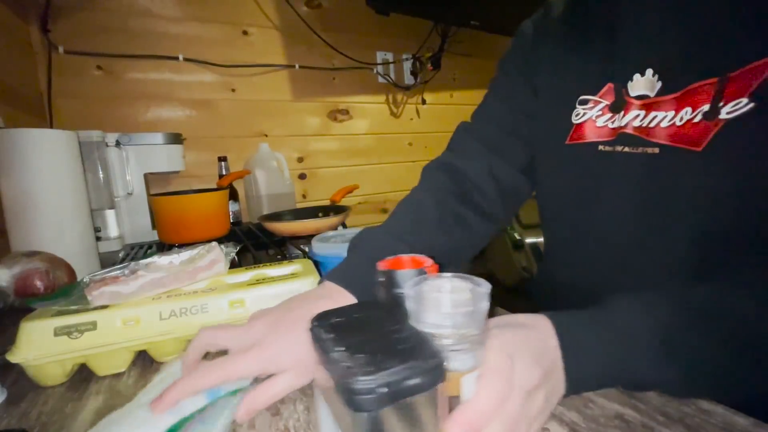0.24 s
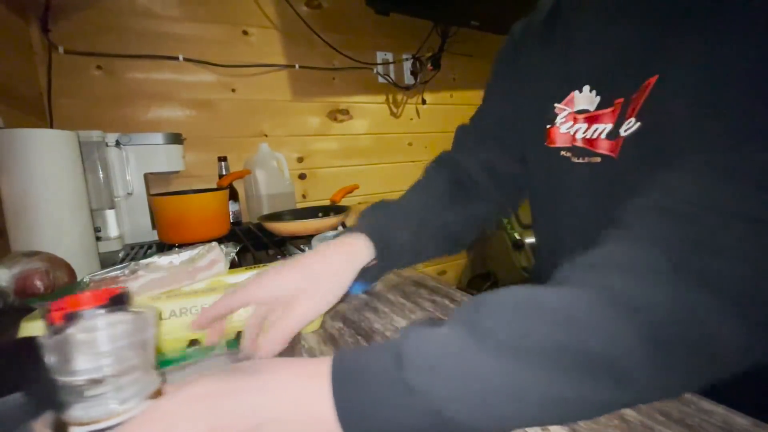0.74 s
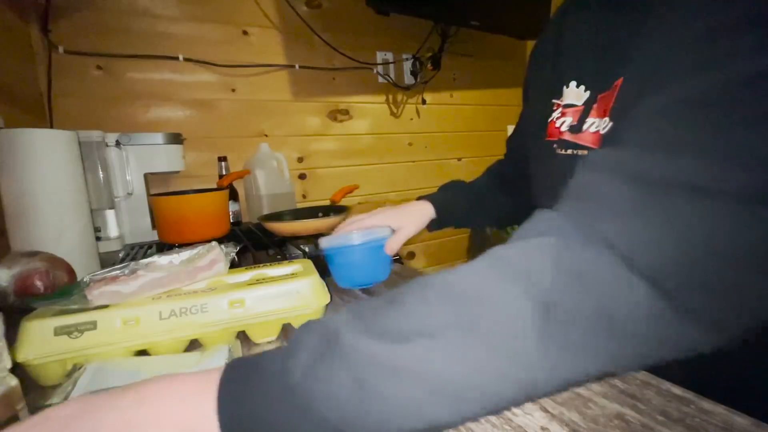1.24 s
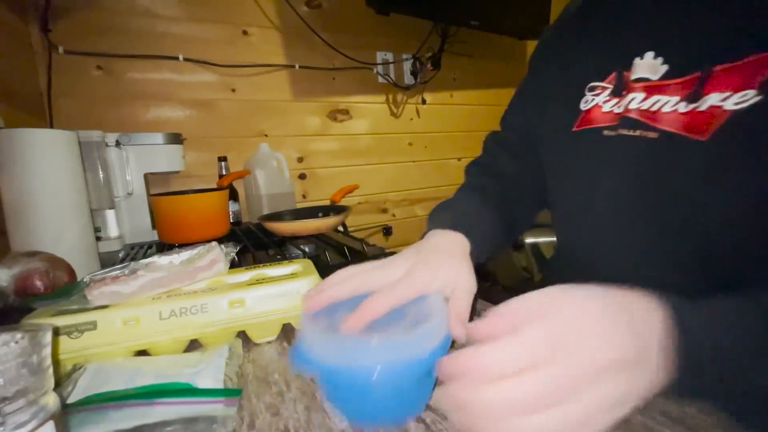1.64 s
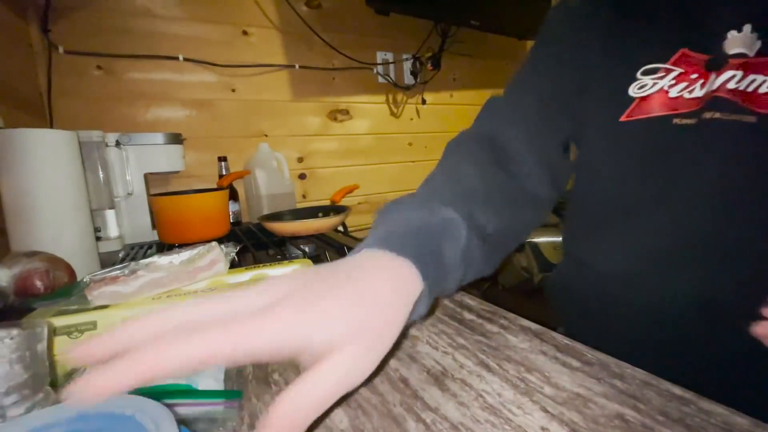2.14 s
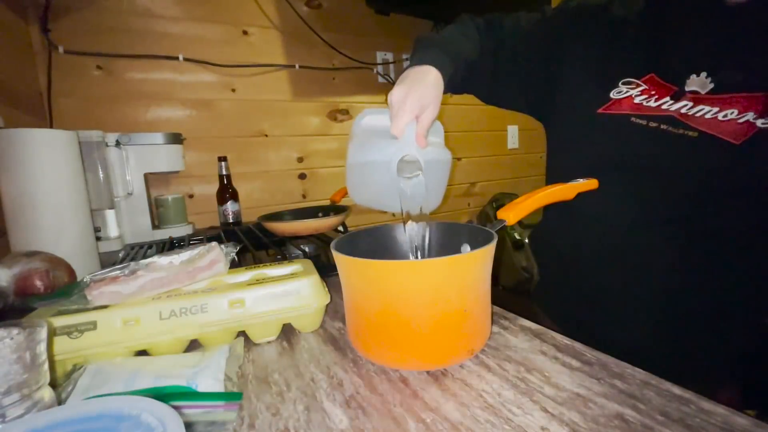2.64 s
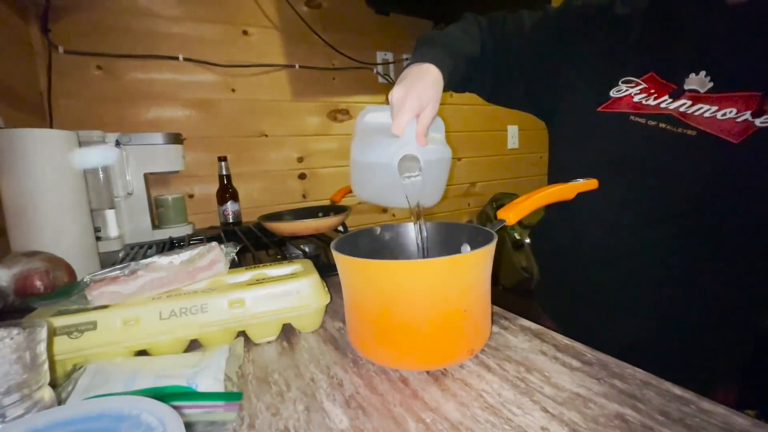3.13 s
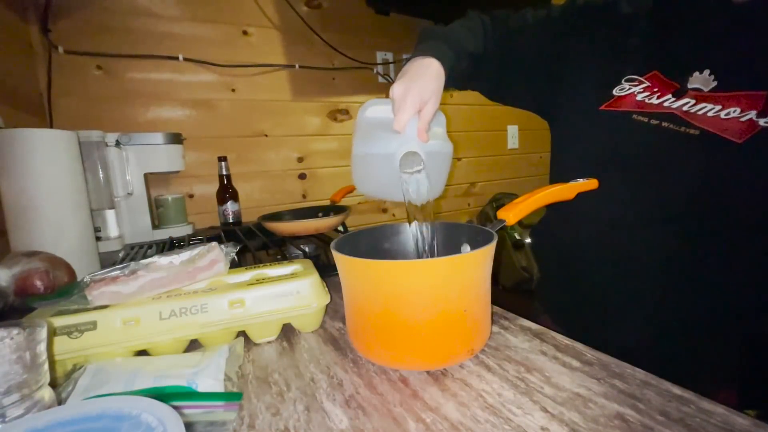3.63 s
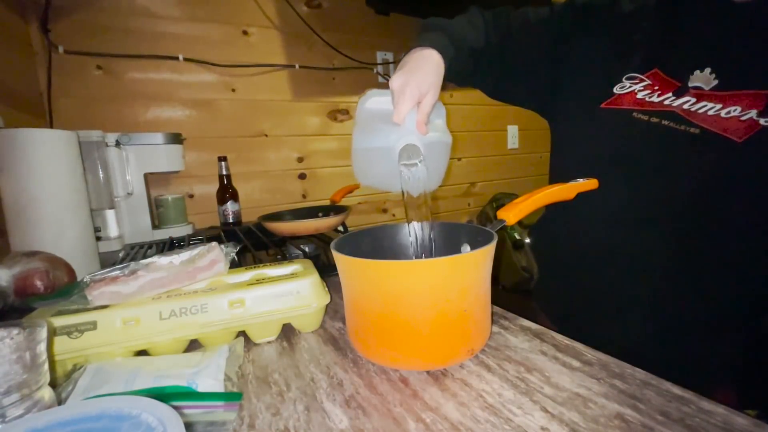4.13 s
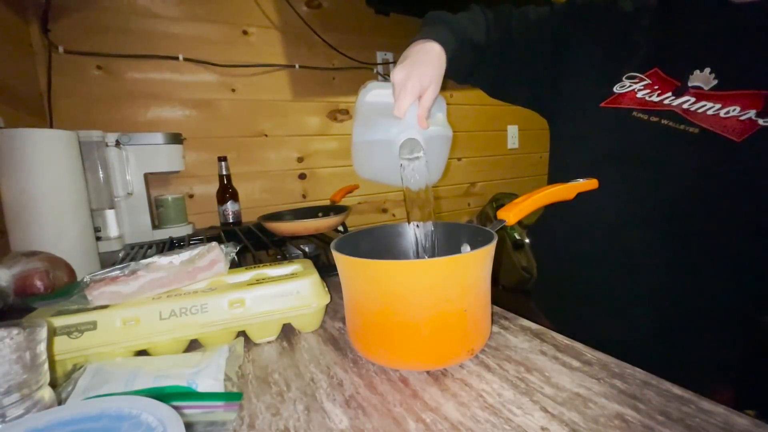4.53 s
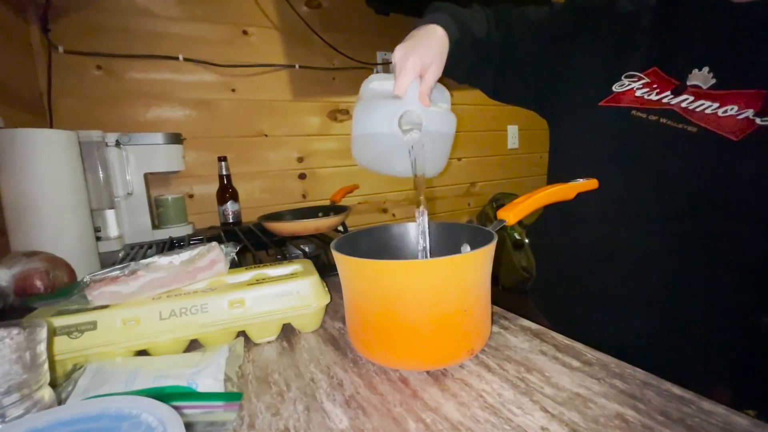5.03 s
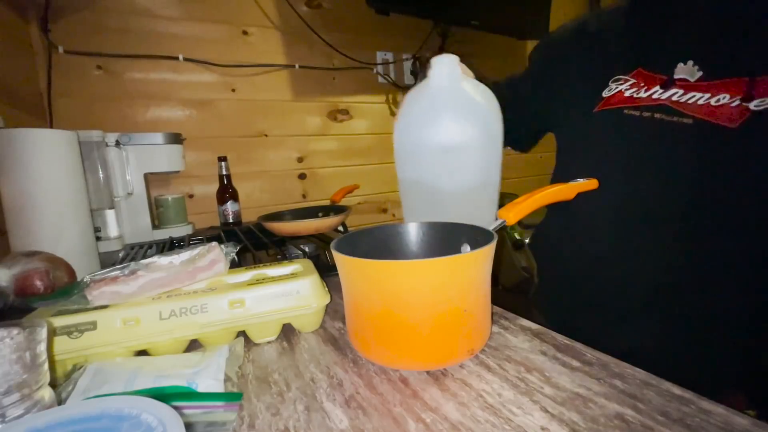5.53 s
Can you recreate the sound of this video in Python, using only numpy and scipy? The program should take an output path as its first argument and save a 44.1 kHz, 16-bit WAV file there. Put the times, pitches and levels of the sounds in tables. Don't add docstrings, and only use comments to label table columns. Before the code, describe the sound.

In a small wooden cabin kitchen, jars are shoved over the counter with a loud gritty scrape and hard clacks. A plastic tub drags after them with a faint squeak, thuds and a burst of glass clinks. Then much softer water patters into a metal saucepan, with jug glugs and bright plinks. A low generator drones throughout. Close stereo microphones, handling nearer the left.

```python
import sys
import numpy as np
from scipy import signal
from scipy.io import wavfile
from scipy.ndimage import uniform_filter1d

SR = 44100
rng = np.random.default_rng(int(sys.argv[2]) if len(sys.argv) > 2 else 0)


def to_wav(s):
    ch = np.atleast_2d(s).T
    pcm = np.round(np.clip(ch, -1, 1) * 32767)
    wavfile.write(sys.argv[1], SR, pcm.astype(np.int16))


def attenuation_scalar(level_db):
    decades = np.asarray(level_db, float) / 20
    return 10 ** decades


N = 254456

# [t/s, weight on counter level/dB, sliding speed level/dB]
JOSTLE = [
    (0, -24, -49.5),
    (0.06, -30, -75),
    (0.09, -41, -60),
    (0.13, -33, -45),
    (0.2, -31, -42),
]
PUSH = [
    (0.235, -27, -39),
    (0.265, -16, -37),
    (0.4, -13.5, -33),
    (0.68, -15, -36.5),
    (0.8, -16, -39.5),
    (1.03, -19, -43.5),
    (1.15, -25, -47),
    (1.2, -36.5, -57),
    (1.239, -42, -63),
]
DRAG = [
    (1.24, -52, -56),
    (1.33, -40, -45),
    (1.42, -22.5, -46),
    (1.54, -25.5, -37),
    (1.61, -20.5, -33.5),
    (1.66, -31, -30),
    (1.75, -28, -27.5),
    (1.86, -32.5, -32),
    (1.92, -44, -35.5),
]
SETTLE = [
    (1.97, -29, -39),
    (2.08, -27.5, -46),
    (2.22, -33, -54),
    (2.38, -43.5, -64),
    (2.46, -68, -86),
]
# [power of weight, power of speed, level/dB]
JARS_SCRAPE = (1.2, .3, 12.8)
TUB_SCRAPE = (.6, .35, 2.5)
# [f/Hz, width/Hz, level/dB]
JARS_COLOUR = [(29, -51), (50, -16.5), (155, -7.5), (218, -9.5), (291, 1.5), (337, -10), (408, 9.5),
               (1210, -11), (1870, -20), (12900, -45.5), (16000, -54)]
JARS_RING = [(156.4, 45, -1), (297, 16, -3), (641, 13, -1.5), (1043, 26, 3), (1267, 11.5, 4.5)]
TUB_COLOUR = [(29, -29), (50, -8), (189, -13), (291, -5.5), (337, -13.5), (428, -0.5), (646, 1), (997, -9),
              (2160, -16.5), (3030, -26.5), (4560, -23), (5530, -29), (13200, -33), (14900, -39),
              (16000, -66)]
TUB_RING = [(173, 50, -4), (302, 36, -6.5), (625, 14, -0.5), (4750, 510, -6.5)]
# [t/s, level/dB]
RUB = [
    (1.235, -54),
    (1.26, -38),
    (1.34, -35),
    (1.375, -40),
]
RUB_HZ, RUB_CLIMB_HZ, RUB_WIDTH_HZ = 780., 150., 240.
# [t/s, level/dB, f/Hz, t60/s, contact level/dB if hard]
THUDS = [(0.1425, -23, 305, 0.22, -1.5), (1.118, -20.5, 183, 0.14), (1.376, -10.5, 200, 0.12, -14),
         (1.407, -22.5, 300, 0.049), (1.449, -27, 178, 0.024), (1.476, -17.5, 208, 0.2),
         (1.489, -10.5, 173, 0.14, -8), (1.529, -16, 472, 0.061), (1.925, -18.5, 125, 0.094),
         (2.074, -18.5, 730, 0.087), (2.085, -17.5, 554, 0.11), (2.163, -15, 202, 0.1)]
# [t/s, level/dB, top band re clack/dB, glass ring re clack/dB if struck]
CLACKS = [(0.0815, -36.5, 1.5), (0.0945, -29.5, -5), (0.1425, -17, -12), (0.6425, -26, -37),
          (0.6948, -25.5, -15), (0.8854, -30, -4), (0.8922, -13, -5), (0.9933, -16, -6), (1.062, -16, -11),
          (1.087, -16.5, -1.5), (1.1673, -26.5, -41.5), (1.9205, -22, -19), (1.9832, -23, -20),
          (2.356, -45.5, 0), (2.4474, -50, -12)]
CLINKS = [(2.0184, -7.5, -15, -20.5), (2.0274, -16, -22, -24), (2.0486, -22, -11, -30),
          (2.0564, -13, -9, -38), (2.073, -15.5, -9, -31), (2.103, -21, -13, -29), (2.148, -23.5, -16, -31),
          (2.16, -23.5, -10, -29), (2.1854, -26, -36, -22), (2.1919, -20, -22, -23.5),
          (2.2114, -20, -34, -27)]
# [f/Hz, level/dB]
CLACK_COLOUR = [(710, -30), (1200, -14), (2140, -5), (3310, -5.5), (4930, -6.5), (7570, -19), (8000, -14),
                (10400, -35), (17600, -120)]
# [f/Hz, level/dB, t60/s]
GLASS = [(2800, -4, .06), (3343, 0, .15), (4828, -6, .1), (8634, 0, .26), (8662, -6, .2), (8700, -2, .05)]
# [t/s, flow level/dB, spray re flow/dB as the stream breaks up]
POUR = [(2.4, -65, 0), (2.6, -68.5, -21), (2.84, -62, -16), (2.9, -57, -1.5), (3.07, -54, 0.5),
        (3.17, -57, -1.5), (3.28, -51.5, -3.5), (3.38, -60, 2), (3.6, -52.5, -3), (3.85, -50.5, -3.5),
        (4.1, -49.5, -12), (4.7, -55, -10), (4.9, -54, -11), (5.05, -53, -5), (5.25, -48, -4.5),
        (5.37, -53.5, -6.5), (5.46, -67, -12), (5.64, -64.5, -8)]
FULL_FLOW_S = 3.4, 5.38
# [f/Hz, level/dB]
POUR_COLOUR = [(240, -46), (400, -6), (425, -3), (676, 4), (826, 2), (879, -8), (1650, -10.5), (1990, -11),
               (2320, -6.5), (5600, -20), (6850, -15.5), (7400, -30), (8240, -20.5), (12100, -22.5),
               (16000, -32)]
# [f/Hz, width/Hz, level/dB]
PAN = [(680, 60, -14), (1150, 48, -2.5), (1642, 5.9, 10.5), (1860, 9.8, 2), (2380, 27, -8), (3080, 58, -6)]
# [t/s, level/dB, f/Hz, t60/s]
GLUGS = [(2.869, -48, 670, 0.2), (3.245, -33.5, 735, 0.045), (3.266, -31, 640, 0.052),
         (3.607, -37.5, 648, 0.11), (3.684, -32.5, 670, 0.068), (4.059, -43.5, 805, 0.077),
         (4.35, -41, 620, 0.13), (4.387, -32.5, 776, 0.12), (4.423, -31, 674, 0.064),
         (4.484, -32.5, 519, 0.13), (4.727, -38.5, 625, 0.11), (4.773, -38, 684, 0.1),
         (4.842, -40, 666, 0.12), (4.891, -29, 560, 0.048), (5.175, -39, 734, 0.08),
         (5.191, -22.5, 563, 0.025), (5.235, -41, 553, 0.08), (5.285, -32.5, 543, 0.068),
         (5.334, -37, 580, 0.08), (5.365, -22, 513, 0.041)]
# [t/s, level/dB, f/Hz]
PLINKS = [(2.732, -46.5, 2280), (2.954, -48, 2800), (3.0028, -36.5, 2970), (3.0734, -39, 1770),
          (3.203, -40.5, 2820), (3.2417, -42.5, 3170), (3.419, -44, 2310), (3.4316, -44, 2730),
          (3.6829, -44, 2420), (3.727, -39, 2340), (3.7836, -35.5, 2200), (3.9657, -37, 2330),
          (4.0401, -42.5, 2340), (4.061, -37, 2200), (4.0899, -39, 2380), (4.3219, -43.5, 2800),
          (4.8895, -42.5, 2370), (5.2098, -39, 2440), (5.2593, -45, 2760)]
SPITS = [(2.6565, -44, 10500), (2.748, -49, 6000), (2.775, -47, 10400), (2.885, -41.5, 8340),
         (2.9356, -41.5, 5050), (3.01, -33, 6040), (3.0695, -39, 10600), (3.0997, -33.5, 7920),
         (3.28, -33, 11700), (3.3006, -32.5, 8020), (3.4774, -42.5, 10950), (4.091, -41, 7880),
         (5.1126, -37, 6700)]
# [t/s, level/dB]
SMACKS = [
    (4.3131, -44),
    (4.6154, -47),
    (4.7197, -47),
    (5.0524, -41),
    (5.1886, -40),
    (5.2584, -40),
    (5.2799, -42),
    (5.3403, -44),
    (5.3737, -43),
]
SMACK_TOP_DB = -.5
JUG_S, JUG_RISE_S, JUG_DB = 5.64, 0.058, -57.5
FIRING_HZ = 31.14
DRONE = [(1, -42), (2, 2.5), (3, -18), (4, -3.5), (5, -5), (6, -9.5), (7, -20), (8, -15.5), (10, -15),
         (12, -15.5), (14, -15)]
DRONE_DB = [(0, -39.5), (2.2, -41.5), (3.3, -41.5), (3.6, -42), (5.77, -42.5)]
# [f/Hz, level/dB]
AIR = [(12, -48), (20, -25), (49, -16), (127, -2.5), (150, -16.5), (187, -8.5), (399, -25), (542, -22.5),
       (660, -31.5), (1290, -31.5), (7520, -58), (10500, -59), (16000, -62)]
AIR_DB = -43
# [f/Hz, t60/s]
CABIN = [(100, 0.46), (500, 0.28), (2000, 0.48), (8000, 0.38), (16000, 0.026)]
# [f/Hz, left-right level/dB]
LEFT_PAIR = [
    [(0, 0), (260, -0.0), (600, 2.2), (1640, 3.6), (3010, 1.1), (4480, 5.9), (5940, 9.0), (7060, 12.3), (7670, 10.0), (8700, 9.2), (9650, 9.3), (10700, 9.0), (12100, 6.5), (16100, 6.2)],
    [(60, 3.0), (110, 4.0), (200, 3.5), (380, -1.5), (700, 4.0), (1290, 5.5), (2380, 2.5), (4400, 6.5), (8120, 5.5), (15000, 0.5)],
]
FAR_PAIR = [
    [(0, 0), (600, 0.9), (860, -1.9), (1460, 3.5), (1980, 1.0), (2580, 0.8), (3190, 2.0), (5600, 1.8), (5940, 3.8), (7750, 6.8), (8350, 10.0), (10200, 9.0), (12600, 6.5), (16100, 6.1)],
    [(60, 1.0), (150, 1.5), (380, 0.0), (950, 3.5), (2380, 2.0), (5980, 3.5), (15000, 0.0)],
]
# [f/Hz, likeness/0-1]
LIKENESS = [(30, .99), (125, .93), (300, .75), (600, .8), (1500, .4), (4000, .3), (9000, .5), (11500, .6),
            (12500, .96)]


def evened(x):
    return x / np.sqrt(np.mean(x ** 2) + 1e-20)


def steady(x, seconds):
    power = abs(uniform_filter1d(x ** 2, size=round(seconds * SR)))
    return x / np.sqrt(power + 1e-9)


def read(points, hz):
    f, value = np.transpose(points)
    return np.interp(np.log(hz + 1), np.log(f + 1), value)


def played(rows):
    s, *columns = np.transpose(rows)
    return [attenuation_scalar(np.interp(np.arange(N) / SR, s, c, -120, -120)) for c in columns]


def add(mix, s, sound):
    part = mix[round(s * SR):][:len(sound)]
    part += sound[:len(part)]


def colour(x, points, modes=(), modes_db=0.):
    hz = abs(np.fft.fftfreq(8192, 1 / SR))
    peaks = sum(attenuation_scalar(db + modes_db) ** 2 / (1 + (2 * (hz - f) / width) ** 2) for f, width, db in modes)
    log_gain = np.log(np.maximum(attenuation_scalar(read(points, hz)), 1e-5) * np.sqrt(1 + peaks))
    response = np.exp(np.conj(signal.hilbert(log_gain)))
    taps = np.fft.ifft(response).real[:4096]
    return signal.oaconvolve(x, taps)[:len(x)]


def band(x, lo_hz, hi_hz):
    sos = signal.butter(N=2, Wn=[lo_hz, hi_hz], btype="band", fs=SR, output="sos")
    return evened(signal.sosfilt(sos, x))


def wander(seconds):
    size = max(round(seconds * SR / 32), 2)
    coarse = rng.standard_normal(N // 32 + 2)
    coarse = evened(uniform_filter1d(uniform_filter1d(coarse, size), size))
    return np.interp(np.arange(N) / 32, np.arange(len(coarse)), coarse)


def grit(per_s, spread_db, clump_db, clump_s):
    size = attenuation_scalar(spread_db * np.minimum(rng.exponential(1, N), 5)) * rng.standard_normal(N)
    struck = rng.random(N) < per_s / SR
    return size * struck * attenuation_scalar(clump_db * wander(clump_s))


def slide(rows, law, points, modes, slips_per_s, uneven_db):
    thrum, hiss = played(rows)
    weight_power, speed_power, scrape_db = law
    scrape = thrum ** weight_power * hiss ** speed_power * attenuation_scalar(scrape_db)
    slips = colour(grit(slips_per_s, uneven_db, .8, .008), points, modes, modes_db=6.)
    grain = colour(grit(14000, 1.2, 1.07, 0.026), points, modes, modes_db=6.5)
    counter = thrum * steady(band(slips, 60, 400), .06)
    body = scrape * steady(band(slips, 400, 1800), .04)
    return counter + body + hiss * band(grain, 2070, 20000)


def squeak():
    hz = RUB_HZ + RUB_CLIMB_HZ * np.interp(np.arange(N) / SR, [RUB[0][0], RUB[2][0]], [0, 1])
    r = np.exp(-np.pi * RUB_WIDTH_HZ / SR)
    a, b = signal.lfilter([1], np.convolve([1, -r], [1, -r]), rng.standard_normal((2, N)))
    carrier = np.exp(2j * np.pi * np.cumsum(hz) / SR)
    whistle = ((a + 1j * b) * carrier).real
    return played(RUB)[0] * steady(whistle, 0.037)


def thuds():
    out, t = np.zeros(N), np.arange(6000) / SR
    chance = rng.standard_normal((len(THUDS), 2, 6000))
    for (s, db, hz, t60, *bright_db), (rattle, contact) in zip(THUDS, chance):
        fade = attenuation_scalar(-60 * t / t60)
        rattle = band(band(rattle, 206, 1290), 206, 1290) * fade
        body = np.sin(2 * np.pi * hz * t) + 1.08 * rattle
        tick = band(band(contact, 1000, 3300), 1000, 3300) * attenuation_scalar(-60 * t / .022)
        tick = attenuation_scalar(max(bright_db, default=-30)) * tick
        add(out, s, attenuation_scalar(db - 2.5) * (body * fade * (1 - np.exp(-t / .0006)) + tick))
    return out


def clacks(rows, t60):
    out, t = np.zeros(N), np.arange(4000) / SR
    chance = rng.standard_normal((len(rows), 2, 4000))
    long = np.arange(16000) / SR
    ring = sum(attenuation_scalar(db - 60 * long / decay) * np.sin(2 * np.pi * hz * long) for hz, db, decay in GLASS)
    for (s, db, top_db, *ring_db), (crack, top) in zip(rows, chance):
        crack = evened(colour(crack, CLACK_COLOUR)) * attenuation_scalar(-60 * t / t60)
        top = attenuation_scalar(top_db) * band(top, 6000, 14800) * attenuation_scalar(-60 * t / (0.61 * t60))
        add(out, s, attenuation_scalar(db - 4.5) * (crack + top) * (1 - np.exp(-t / 0.00024)))
        for strike_db in ring_db:
            add(out, s, attenuation_scalar(db + strike_db) * ring)
    return out


def stream():
    s, flow_db, spray_db = np.transpose(POUR)
    metal, spray = played(np.transpose([s, flow_db, flow_db + spray_db]))
    sleeve = attenuation_scalar(JUG_DB) * np.clip((np.arange(N) / SR - JUG_S) / JUG_RISE_S, 0, 1)
    patter = colour(grit(3500, 2.0, 0.46, 0.018), POUR_COLOUR, PAN, modes_db=11.0)
    burble = colour(grains(grit(300, 2.6, 2.2, .03), 1100, 4800, cycles=11.), POUR_COLOUR)
    fizz = colour(grains(grit(7000, 2.8, 1.8, .01), 3300, 15800, cycles=4.), POUR_COLOUR)
    water = metal * (band(patter, 870, 3440) + .5 * evened(burble))
    return water + (spray + sleeve) * band(fizz, 4850, 16600)


def grains(drops, lo_hz, hi_hz, cycles):
    out, which = np.zeros(N), rng.integers(0, 18, N)
    for k, hz in enumerate(np.geomspace(lo_hz, hi_hz, num=18)):
        turns = np.arange(round(4 * cycles * SR / hz)) * hz / SR
        tone = np.sin(2 * np.pi * turns * (1 + 0.0013 * turns)) * np.exp(-turns / cycles)
        tone = tone / np.linalg.norm(tone) * np.sqrt(hz)
        out += signal.oaconvolve(drops * (which == k), tone)[:N]
    return out


def bubbles(rows, t60, rise, rough, level_db):
    out, t = np.zeros(N), np.arange(4000) / SR
    chance = rng.standard_normal((len(rows), 4000))
    for (s, db, hz, *own_t60), noise in zip(rows, chance):
        fade = t / (own_t60 or [t60])[0]
        tone = np.sin(2 * np.pi * hz * t * (1 + rise * fade))
        tone = tone + rough * band(noise, 0.8 * hz, 1.28 * hz)
        add(out, s, attenuation_scalar(db + level_db - 60 * fade) * tone * (1 - np.exp(-t * hz * 0.88)))
    return out


def strays(count, lo_hz, hi_hz, over_db):
    when, size, strength = rng.random((count, 3)).T
    start_s, end_s = FULL_FLOW_S
    s = start_s + when * (end_s - start_s)
    flow_db = np.interp(s, *np.transpose(POUR)[:2])
    return list(zip(s, flow_db + over_db - 6 * strength, lo_hz * (hi_hz / lo_hz) ** size))


def generator():
    turns = np.cumsum(FIRING_HZ * (1 + 0.00396 * wander(0.336))) / SR
    orders = np.zeros(N)
    for k, db in DRONE:
        orders += attenuation_scalar(db + 1.25 * wander(0.22)) * np.cos(2 * np.pi * (k * turns + rng.random()))
    air = colour(rng.standard_normal(N) * attenuation_scalar(1.2 * wander(.03)), AIR)
    return played(DRONE_DB)[0] * attenuation_scalar(-0.5) * evened(orders) + attenuation_scalar(AIR_DB) * evened(air)


def cabin(x):
    hz, t, z = signal.stft(rng.standard_normal(SR // 2), SR, nperseg=256)
    decay = attenuation_scalar(-60 * t / read(CABIN, hz)[:, None]) * (t > .004)
    tail = signal.istft(z * decay, SR, nperseg=256)[1]
    return x + attenuation_scalar(-13.) * signal.oaconvolve(x, tail / np.linalg.norm(tail))[:N]


def pair(x, angles, scattered):
    lag, tilt_db = angles
    hz, t, z = signal.stft(x, SR, nperseg=512)
    a, b = uniform_filter1d(rng.standard_normal((2, *z.shape)), size=3, axis=2)
    scatter = 1.333 * np.exp(1j * np.angle(a + 1j * b))
    like = read(LIKENESS, hz)[:, None] ** scattered
    tilt = attenuation_scalar(read(tilt_db, hz) / 2)
    left = (tilt * np.exp(1j * np.interp(hz, *np.transpose(lag)) / 2))[:, None]
    right = 1 / left
    mean = np.sqrt(abs(left + like * right) ** 2 + (1 - like ** 2) * abs(right) ** 2) / 2
    ports = np.array([left * z, right * z * (like + np.sqrt(1 - like ** 2) * scatter)])
    return signal.istft(ports / mean, SR, nperseg=512)[1][:, :N]


def scene():
    jars = slide(JOSTLE + PUSH, JARS_SCRAPE, JARS_COLOUR, JARS_RING, slips_per_s=3800, uneven_db=0.4)
    tub = slide(DRAG + SETTLE, TUB_SCRAPE, TUB_COLOUR, TUB_RING, slips_per_s=6000, uneven_db=2.5)
    hits = cabin(thuds() + clacks(CLACKS, t60=0.02) + clacks(CLINKS, t60=0.024))

    faint_glugs = strays(count=10, lo_hz=588, hi_hz=760, over_db=8.0)
    glugs = bubbles(GLUGS + faint_glugs, t60=0.11, rise=0.071, rough=0.3, level_db=2.0)
    faint_plinks = strays(count=30, lo_hz=1577, hi_hz=2970, over_db=8.5)
    plinks = bubbles(PLINKS + faint_plinks, t60=.045, rise=.07, rough=.45, level_db=2.)
    spits = bubbles(SPITS, t60=0.054, rise=0.047, rough=1.1, level_db=-8.5)
    smacks = clacks([(s, db + 4., SMACK_TOP_DB) for s, db in SMACKS], t60=.012)
    drops = cabin(glugs + plinks + spits + smacks)

    near = pair(jars + tub + squeak(), LEFT_PAIR, scattered=1) + pair(hits, LEFT_PAIR, scattered=.35)
    far = pair(stream() + generator(), FAR_PAIR, scattered=1) + pair(drops, FAR_PAIR, scattered=.3)
    return near + far


def roll_off(x):
    return signal.sosfilt(signal.butter(12, 16500, fs=SR, output="sos"), x)


def record(dry):
    limited = signal.oaconvolve(dry, signal.firwin(255, 16100, fs=SR)[None], "same")
    return roll_off(limited)


dry = scene()
out = record(dry)
to_wav(out)
```